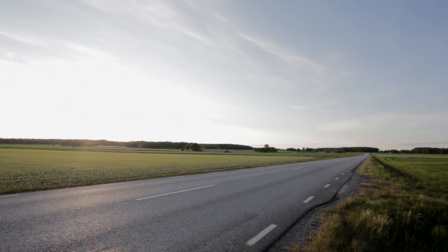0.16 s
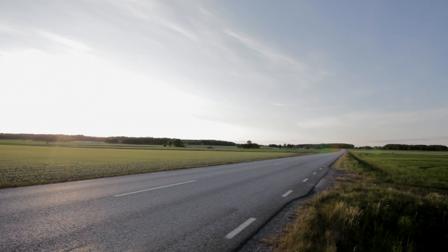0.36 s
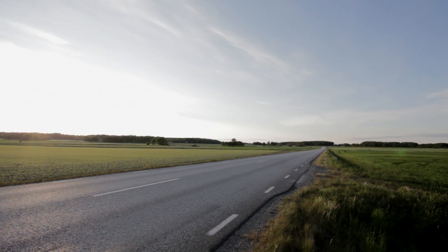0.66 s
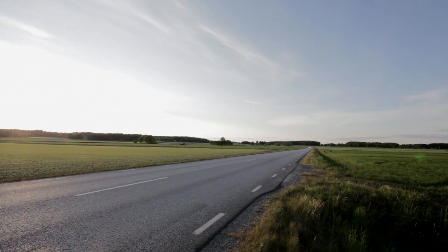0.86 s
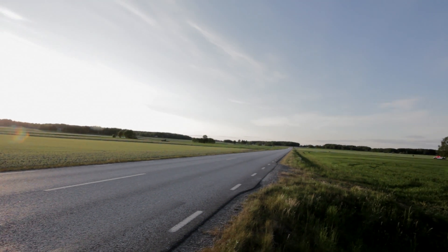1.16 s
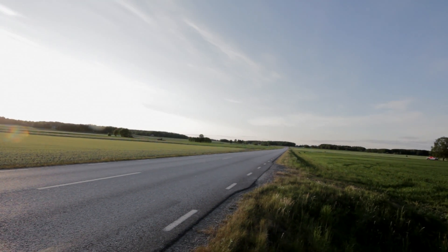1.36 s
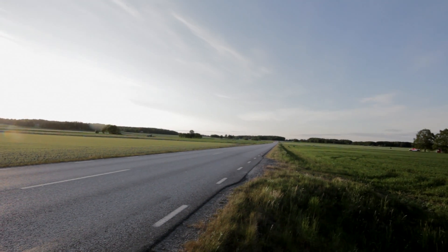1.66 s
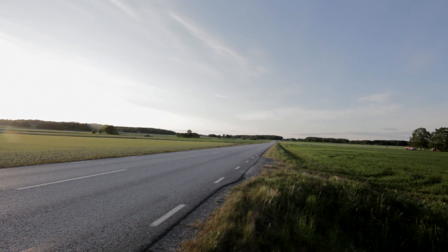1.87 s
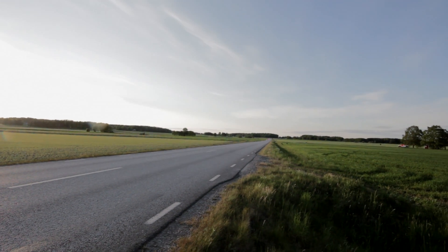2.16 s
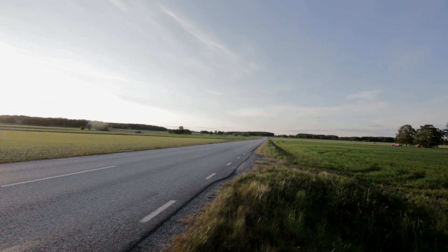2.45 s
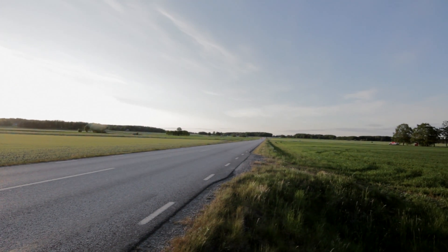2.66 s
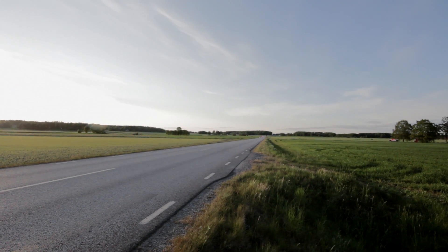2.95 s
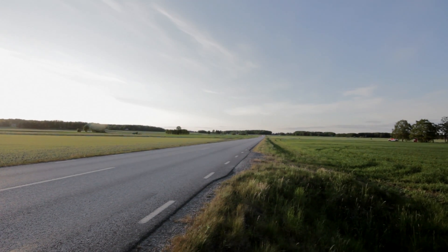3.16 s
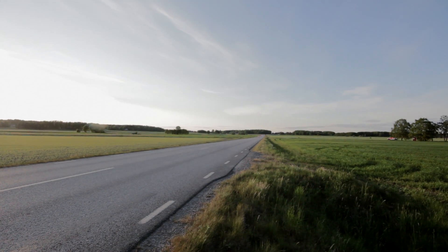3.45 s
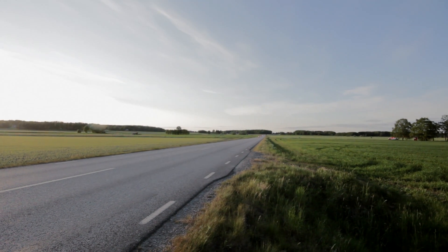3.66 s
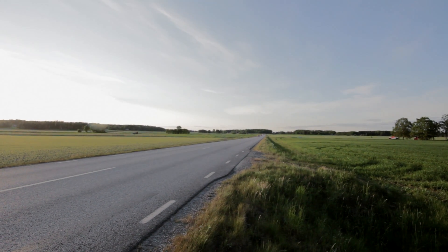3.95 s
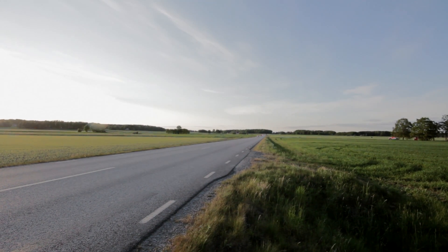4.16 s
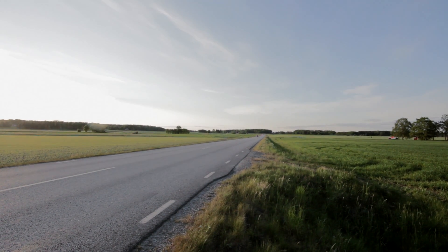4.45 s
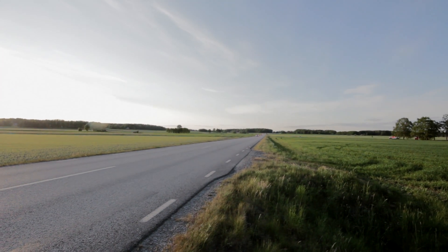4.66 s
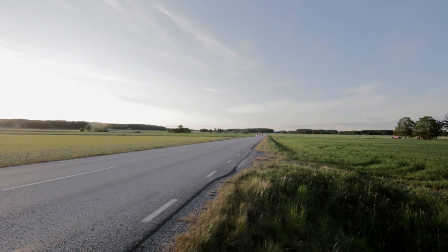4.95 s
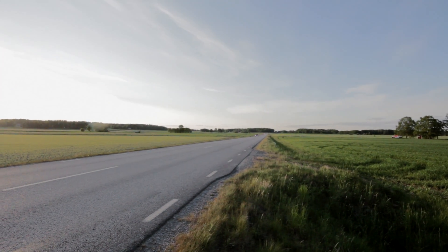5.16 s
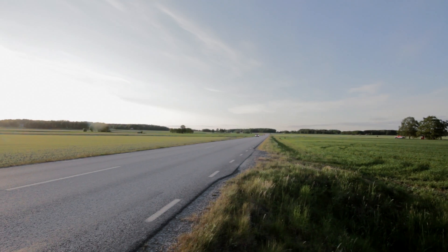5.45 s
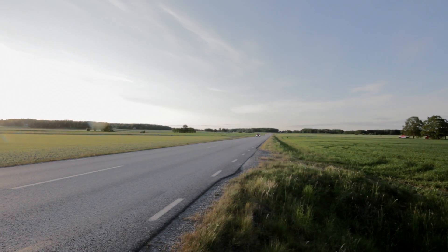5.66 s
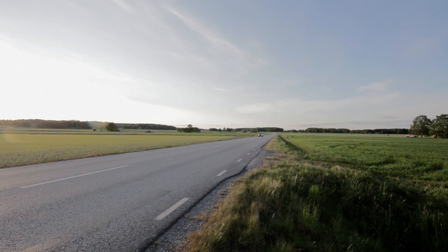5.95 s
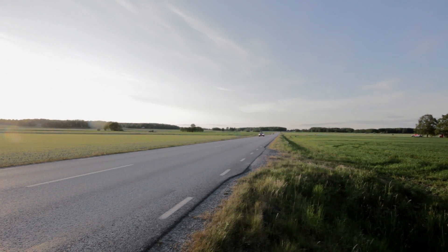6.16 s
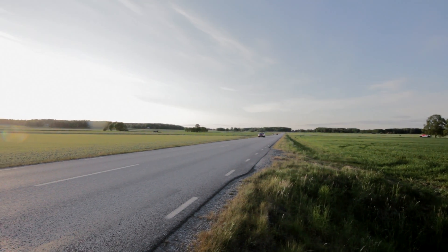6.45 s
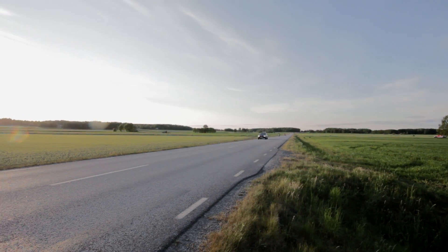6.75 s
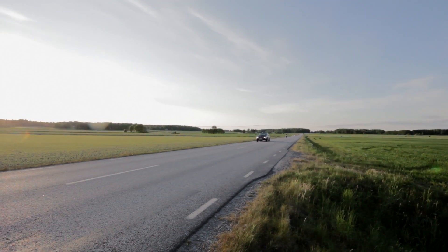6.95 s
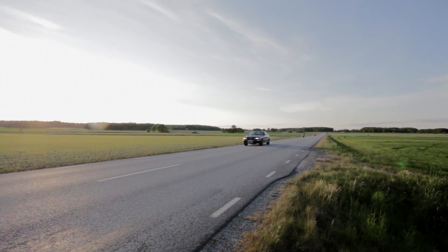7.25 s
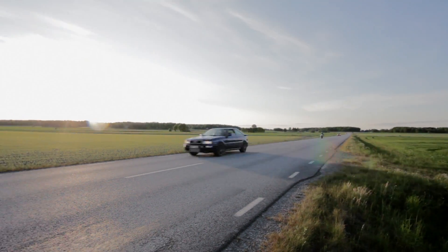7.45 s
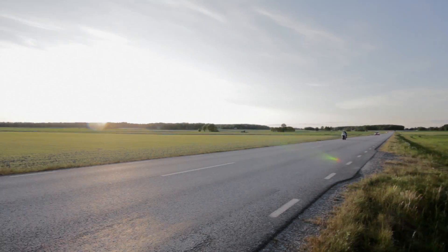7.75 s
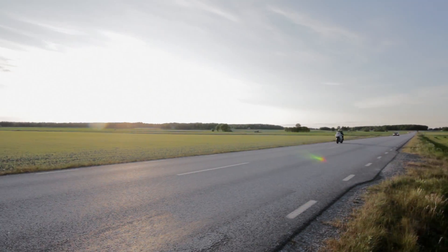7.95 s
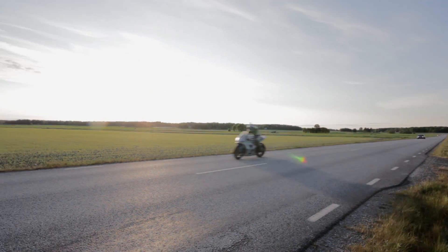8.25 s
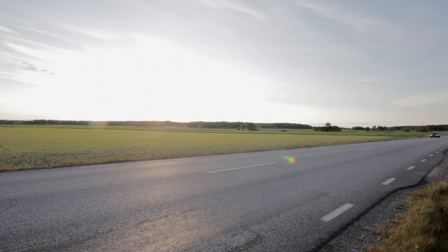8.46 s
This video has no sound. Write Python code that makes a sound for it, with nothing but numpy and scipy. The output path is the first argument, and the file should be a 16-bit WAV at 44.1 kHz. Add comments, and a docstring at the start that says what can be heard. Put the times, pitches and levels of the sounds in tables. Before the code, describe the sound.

Roadside pass-bys: hollow, phasey road noise builds, a five-cylinder car rips by dropping in pitch, then a high-revving motorcycle flashes past.

```python
"""A country road: a turbocharged five-cylinder car and then a motorcycle race past a roadside microphone.
Tyre roar is shaped noise; a delayed copy sweeps notches through it, and its hiss brightens as vehicles near.
Engine notes are sums of wavering tones that drop in pitch at the pass; the turbocharger is a gliding whistle.
Fainter engine tones rise, a far engine coasts, a slower vehicle drones away in steady tones, and low noise
is wind on the microphone."""
import sys
import numpy as np
from scipy import signal
from scipy.fft import rfft, irfft
from scipy.io import wavfile
from scipy.ndimage import uniform_filter1d

SR = 44100
rng = np.random.default_rng(int(sys.argv[2]) if len(sys.argv) > 2 else 0)


def bounce(signal):
    """Save signal as a 16-bit WAV file at the path given by the first command-line argument."""
    frames = np.transpose(np.atleast_2d(signal))
    limited = np.clip(frames, -1, 1)
    pcm = np.round(limited * 32767).astype(np.int16)
    wavfile.write(sys.argv[1], SR, pcm)


N = 379260
TIME = np.arange(N) / SR  # seconds
FRAME, HOP = 1024, 256  # samples in a noise frame, and from one frame to the next
FRAME_S, BIN_HZ = np.arange(N // HOP + 5) * HOP / SR, np.fft.rfftfreq(FRAME, 1 / SR)


def gain_of(db):
    """Decibels to amplitude."""
    return 10 ** (np.asarray(db) / 20)


def follow(rows, t):
    """Read every column of a timed table at the times t, in straight lines between its rows."""
    s, *columns = np.transpose(rows)
    return [np.interp(t, s, column) for column in columns]


def colour(points):
    """Amplitude of a spectrum at every frequency bin."""
    hz, db = np.transpose(points)
    return gain_of(np.interp(np.log(BIN_HZ + 1), np.log(hz), db))


def wander(rate_hz):
    """A random sway of rms 1, mostly slower than the given rate."""
    spectrum = rfft(rng.standard_normal(2 ** 13))
    bin_hz = np.arange(len(spectrum)) * SR / N
    sway = irfft(spectrum / (1 + (bin_hz / rate_hz) ** 4))
    return np.interp(TIME, np.linspace(0, N / SR, len(sway)), sway / sway.std())


def power(shape, db):
    """Power by frame and bin of a spectrum played at a changing level."""
    return shape ** 2 / np.sum(shape ** 2, -1, keepdims=True) * gain_of(db)[:, None] ** 2


def noise(field):
    """Noise with the given power by frame and bin."""
    z = rng.standard_normal(field.shape) + 1j * rng.standard_normal(field.shape)
    return signal.istft((z * np.sqrt(field)).T, nperseg=FRAME, noverlap=FRAME - HOP)[1][:N]


def swell(t, peak_s, db, rise_s, fall_s):
    """Level in dB of something that comes, peaks and goes."""
    u = (t - peak_s) / np.where(t < peak_s, rise_s, fall_s)
    return db - 20 * np.log10(1 + u ** 2)


def passed(at_s, length_s):
    """A smooth step from 0 before a moment to 1 after it."""
    return .5 + .5 * np.tanh((TIME - at_s) / length_s)


def during(start_s, end_s, fade_s=0.092):
    """1 between two times, with soft edges."""
    return np.clip(.5 + np.minimum(TIME - start_s, end_s - TIME) / fade_s, 0, 1)


def doppler(abreast_s, near_s, mach):
    """Pitch factor of a source driving by in a straight line: raised coming, lowered going."""
    ahead_s = abreast_s - TIME
    return 1 / (1 - mach * ahead_s / np.hypot(ahead_s, near_s))


# How strong the car's upper tread resonance and hiss are as it comes and goes.
# Each row: time in seconds, strength in dB.
TYRES = [(0, -12.5), (1, -11), (2.45, -9), (2.85, 0), (3.4, -2.5), (4.3, 0), (5.35, -1), (5.6, 1.5),
         (5.75, -0.4), (6.7, 0.5), (6.95, -1), (7.82, -5.5), (7.89, -12.5), (8.6, -25)]
# The car's low road roar. Each row: time in seconds, drone level in dB, body level in dB.
LOW_ROAR = [(0, -34.5, -38), (1, -34.5, -40), (2.7, -33, -34.5), (3.6, -33.5, -38), (4.65, -28, -31),
            (5.3, -34.5, -32), (5.75, -38.5, -34.5), (6.5, -36.5, -34), (6.9, -41, -36), (7.65, -36.5, -32),
            (8.1, -41, -37), (8.6, -37, -43)]
# The car's main tread resonance. Each row: time in seconds, level in dB.
TREAD = [(0, -40), (.7, -37.5), (.95, -34.5), (2.4, -32.5), (2.7, -45), (3.05, -28.5), (4.2, -31),
         (4.7, -25.5), (6.4, -28), (7.6, -32), (7.95, -36.5), (8.6, -42)]
UPPER_DB, UPPER_GROWTH = -25.5, 1.19  # upper resonance: dB at strength 0, dB added per dB of strength
# The motorcycle's rush, one swell for each part.
# Each one: peak in seconds, level in dB, rise in seconds, fall in seconds.
BIKE_DRONE, BIKE_BODY = (8.43, -30, .12, .11), (8.34, -32, .14, .2)
BIKE_TREAD, BIKE_UPPER = (8.31, -25.5, .08, .12), (8.44, -30, .15, .12)
BIKE_SPREAD = 2.2  # its tyre resonances are this many times wider than the car's


def road_roar(patchy_db=0.9, flutter_db=0.67, puff_depth=.55, puff_s=0.98):
    """Tyre and air noise: a delayed copy sweeps notches through it and turbulence mottles it."""
    tyres_db, = follow(TYRES, FRAME_S)
    upper_db = UPPER_DB + UPPER_GROWTH * tyres_db
    car = tyre_roar(*follow(LOW_ROAR, FRAME_S), *follow(TREAD, FRAME_S), upper_db, 1)
    bike_levels = [swell(FRAME_S, *part) for part in (BIKE_DRONE, BIKE_BODY, BIKE_TREAD, BIKE_UPPER)]
    bike = tyre_roar(*bike_levels, BIKE_SPREAD)
    patches = rng.standard_normal(car.shape)
    patches = uniform_filter1d(patches, size=14, axis=0)  # smooth over time
    patches = uniform_filter1d(patches, size=8, axis=1)  # smooth over pitch
    mottling = phasing() * gain_of(patchy_db * patches / patches.std()) ** 2
    # at first the hiss puffs in time with the slow vehicle's exhaust
    puff_angle = 2 * np.pi * HUM_TONES[0][0] * TIME + wander(16)
    puffing = 1 + puff_depth * np.exp(-TIME / puff_s) * np.cos(puff_angle)
    roar = noise((car + bike) * mottling)
    hiss = noise(tyre_hiss(tyres_db) * mottling) * puffing
    return (roar + hiss) * gain_of(flutter_db * wander(55))


def crest(centre_hz, width_hz):
    """A resonance with steep skirts."""
    off = ((BIN_HZ - centre_hz) / width_hz) ** 2
    return 1 / (1 + 0.68 * off + 0.12 * off ** 2)


# Spectra of the drone and the body of the roar. Each row: frequency in Hz, relative level in dB per Hz.
DRONE = [(30, -27.5), (95, -20.5), (115, -21.5), (140, -4.5), (220, 0.5), (320, -3), (400, -6),
         (520, -12.5), (800, -26.5), (1500, -64)]
BODY = [(100, -28.5), (300, -18.5), (430, 0.5), (550, 1.5), (750, -2.5), (900, -13.5), (1300, -17),
        (2500, -65)]
TREAD_HZ, TREAD_WIDTH_HZ = 951, 100  # main tread resonance, with the car's width
UPPER_HZ, UPPER_WIDTH_HZ = 1309, 176  # upper tread resonance, with the car's width


def tyre_roar(drone_db, body_db, tread_db, upper_db, spread):
    """Power of one vehicle's roar: drone, body and two tread resonances."""
    low = power(colour(DRONE), drone_db) + power(colour(BODY), body_db)
    tread = power(crest(TREAD_HZ, spread * TREAD_WIDTH_HZ), tread_db)
    upper = power(crest(UPPER_HZ, spread * UPPER_WIDTH_HZ), upper_db)
    return low + tread + upper


# Spectrum of the hiss before the air dulls it. Each row: frequency in Hz, relative level in dB per Hz.
HISS = [(600, -29.5), (1300, -13.5), (1720, 3.5), (2100, -0.5), (2500, -3), (3150, -4), (4400, -9.5),
        (7000, -15), (10000, -18), (13000, -17.5), (16000, -21)]
HISS_DB = -37  # the car's hiss at strength 0, far away
HISS_NEAR_DB, HISS_NEAR_S = 9.5, 1.0  # extra dB when the car is close, and how quickly it builds
# The motorcycle's hiss: peak in seconds, level in dB, rise in seconds, fall in seconds.
BIKE_HISS = (8.46, -28.5, .16, .18)


def tyre_hiss(tyres_db, steepening=0.043):
    """Power of the hiss of both vehicles, dulled by the air on the way."""
    closeness = np.exp(-np.maximum(CAR_BRIGHT_S - FRAME_S, 0) / HISS_NEAR_S)
    car_db = HISS_DB + tyres_db + HISS_NEAR_DB * closeness
    level = gain_of(car_db) ** 2 + gain_of(swell(FRAME_S, *BIKE_HISS)) ** 2
    khz = np.maximum(BIN_HZ - 1900, 0) / 1e3  # only the part above 1900 Hz is dulled
    loss_db = air_loss()[:, None] * khz * (1 + steepening * khz)
    hiss = (colour(HISS) * gain_of(-loss_db)) ** 2
    # the level is that of the middle band
    middle = (BIN_HZ > 1800) & (BIN_HZ < 3200)
    return hiss / np.sum(hiss[:, middle], 1, keepdims=True) * level[:, None]


# Moving air lets the treble through in waves.
# Each row: centre in seconds, extra loss in dB per kHz, length in seconds.
AIR_WAVES = [(4.05, 2, .35), (4.9, -0.55, .3), (5.7, 0.9, .15), (6.25, -0.4, 0.12), (7.15, 0.17, .35)]
CAR_BRIGHT_S, BIKE_BRIGHT_S = 7.62, 8.45  # when each vehicle sounds brightest
LOSS_NEAR, LOSS_FAR = -0.21, 6.54  # dB per kHz at the brightest moment, and the most before the waves
LOSS_PER_S_COMING, LOSS_PER_S_GOING, LOSS_PER_S_BIKE = 1.376, 2.85, 5.5  # dB per kHz one second away
LOSS_CURVE = 1.02  # power of the time away


def air_loss():
    """Treble lost in the air in dB per kHz: it grows with time from the nearer vehicle's brightest moment."""
    since = FRAME_S - CAR_BRIGHT_S
    car = np.where(since < 0, LOSS_PER_S_COMING, LOSS_PER_S_GOING) * abs(since) ** LOSS_CURVE
    bike = LOSS_PER_S_BIKE * abs(FRAME_S - BIKE_BRIGHT_S) ** LOSS_CURVE
    waves = sum(loss * np.exp(-((FRAME_S - s) / length) ** 2) for s, loss, length in AIR_WAVES)
    return np.minimum(LOSS_NEAR + np.minimum(car, bike), LOSS_FAR) + waves


# An upside-down delayed copy of the roar, whose changing lag sweeps notches through it.
# Each row: time in seconds, lag in milliseconds, depth of the notches from 0 to 1.
DELAYED_COPY = [(0, 2.4, 0.1), (1, 2.34, 0.56), (1.5, 2.04, .25), (2.3, 2.08, 0.45), (2.6, 1.99, 0.74),
                (3, 1.78, 0.56), (3.55, 1.46, 0.6), (4.3, 1.016, 0.89), (4.65, 0.72, 0.8), (5.2, 0.53, .65),
                (5.6, 0.25, 0.4), (6.4, 0.48, 0.12), (7, 0.54, 0.16)]
FILL_IN_HZ = 3000  # around here and above the notches fill in


def phasing():
    """Power gain of a sound plus its delayed copy: the notches move up in pitch when the lag shrinks."""
    lag_ms, depth = follow(DELAYED_COPY, FRAME_S)
    depth = np.clip(depth, 0, .95)[:, None] / (1 + (BIN_HZ / FILL_IN_HZ) ** 2)
    return 1 - depth * np.cos(2 * np.pi * BIN_HZ * lag_ms[:, None] / 1e3)


def engine(hz, db, orders, behind, jitter, shimmer_db, rough):
    """Tones at multiples of an engine's rate; intake tones lead from the front, exhaust from behind."""
    turns = np.cumsum(hz * (1 + jitter * wander(23.9))) / SR
    out, total = np.zeros(N), 0
    for order, front_db, rear_db in orders:
        height = gain_of(front_db + (rear_db - front_db) * behind)
        angle = 2 * np.pi * (order * turns + rng.random())
        # moving air fades each tone on its own; uneven firing smears it
        steady = gain_of(shimmer_db * wander(5)) * np.cos(angle)
        smeared = rough * wander(38) * np.sin(angle)
        out += height * (steady + smeared)
        total = total + height ** 2 / 2
    return out / np.sqrt(total) * gain_of(db)


# The car's engine. Each row: time in seconds, crank turns a second before the pitch bend, level in dB.
CAR = [(5.7, 49.45, -45), (6.3, 50, -32), (6.7, 50.95, -30.5), (7, 52.55, -27), (7.4, 54.1, -26.5),
       (7.85, 54.2, -24.7), (8.12, 53.5, -27.5)]
# Its tones. Each row: multiple of the crank rate, relative dB from the front, relative dB from behind.
CAR_ORDERS = [(2, -17, -30), (4, -1.5, -25), (5, -2, 0), (6, -11, -24), (7, -11, -17), (8, -2.5, -25),
              (9, -11, -22), (10, -4, 0), (11, -11, -20), (14, -2, -22), (15, 5, -9), (15.5, -3, -18),
              (16, -10, -22), (20, -17, -13), (22, 0, -24), (25, -12, -15), (30, -6, -22), (36, -12, -26)]
# When abreast in seconds, seconds to cover its own closest distance, speed as a share of sound's.
CAR_PASS = (7.8, .13, .142)


def car_engine():
    """The five-cylinder gathers revs and drops in pitch as it goes by."""
    crank_hz, db = follow(CAR, TIME)
    hz = crank_hz * doppler(*CAR_PASS)
    sound = engine(hz, db, CAR_ORDERS, passed(7.68, .12), jitter=.0012, shimmer_db=1.4, rough=.2)
    return sound * during(CAR[0][0], CAR[-1][0])


def whistle(hz, db, smear, shimmer_db):
    """A fuzzy gliding tone of a fast-spinning part."""
    tone = np.sin(2 * np.pi * np.cumsum(hz * (1 + smear * wander(207))) / SR)
    return np.sqrt(2) * tone * gain_of(db + shimmer_db * wander(31))


# The turbocharger's whistle. Each row: time in seconds, level in dB.
TURBO_LEVEL = [(6.25, -56), (6.6, -59), (6.7, -46.5), (6.8, -55.5), (7.35, -56), (7.62, -44.5), (7.95, -61),
               (8.14, -62)]
# A thin whine of the approaching car. Each row: time in seconds, frequency in Hz, level in dB.
WHINE = [(6.1, 3140, -58), (6.3, 3220, -48.5), (6.6, 3220, -42), (6.85, 3250, -51)]
TURBO_HZ, TURBO_IDLE = 8060, .34  # full speed before the pitch bend, and the share it starts from
SPOOL_AT_S, SPOOL_S = 6.465, .28  # middle and length of the spooling up
TURBO_PASS = (7.72, .09, .142)  # abreast and closeness in seconds, share of the speed of sound


def car_whistles():
    """The turbocharger spools up and sweeps by; a thin whine is heard during the approach."""
    spool = TURBO_IDLE + (1 - TURBO_IDLE) * passed(SPOOL_AT_S, SPOOL_S)
    turbo_hz = TURBO_HZ * spool * doppler(*TURBO_PASS)
    turbo = whistle(turbo_hz, *follow(TURBO_LEVEL, TIME), smear=0.00656, shimmer_db=3.0)
    whine = whistle(*follow(WHINE, TIME), smear=0.0025, shimmer_db=1.0)
    turbo *= during(TURBO_LEVEL[0][0], TURBO_LEVEL[-1][0])
    return turbo + whine * during(WHINE[0][0], WHINE[-1][0])


# The motorcycle's tones. Each row: multiple of the firing rate, relative dB from the front, and from behind.
BIKE_ORDERS = [(.5, -18, -9), (1, 0, 0), (1.5, -18, -9), (2, -13, 0), (3, -16, -5), (4, -22, -8),
               (5, -26, -6), (7, -30, -11)]
BIKE_FIRING_HZ, BIKE_HEARD_S = 326, 8.07  # firing rate before the pitch bend, and when it fades in
BIKE_PASS = (8.465, .11, .175)  # abreast and closeness in seconds, share of the speed of sound
# Swell of its engine note: peak in seconds, level in dB, rise in seconds, fall in seconds.
BIKE_ENGINE = (8.33, -30, .34, .42)


def motorcycle():
    """Steady revs, bent down in pitch by the pass, with a rasp close by."""
    hz, db = BIKE_FIRING_HZ * doppler(*BIKE_PASS), swell(TIME, *BIKE_ENGINE)
    sound = engine(hz, db, BIKE_ORDERS, passed(8.42, .04), jitter=.002, shimmer_db=1.5, rough=.2)
    return (sound + rasp(hz)) * during(BIKE_HEARD_S, np.inf)


# Spectrum of the motorcycle's intake and chain rasp. Each row: frequency in Hz, relative level in dB per Hz.
RASP = [(800, -15), (2200, 0), (3200, -2), (4300, 0.5), (6500, -4.5), (9000, -10), (16000, -21)]
BIKE_RASP = (8.46, -29.5, .14, .11)  # its swell: peak in seconds, dB, rise and fall in seconds


def rasp(firing_hz, depth=0.6):
    """Hiss that puffs with every other firing of the motorcycle."""
    hiss = noise(power(colour(RASP), swell(FRAME_S, *BIKE_RASP))) * passed(8.26, .06)
    return hiss * (1 + depth * np.cos(np.pi * np.cumsum(firing_hz) / SR))


# Engine tones, each rising slowly: two gears of a far engine, then a tone of the approaching car.
# Each row: start in seconds, end in seconds, first frequency in Hz, last frequency in Hz, level in dB.
RISING_TONES = [(.85, 2.42, 424, 477.8, -41), (2.6, 4.4, 428, 469.4, -36), (5.71, 6.55, 461, 471, -44)]
RISE_EASING = .7  # each tone climbs ever more slowly


def rising_tones():
    """A far engine climbs through two gears, then a tone of the approaching car climbs likewise."""
    orders, out = [(1, 0, 0), (2, -6, -6), (3, -10, -10)], np.zeros(N)
    for start, end, first_hz, last_hz, db in RISING_TONES:
        share = np.clip((TIME - start) / (end - start), 0, 1)
        climb = np.expm1(-RISE_EASING * share) / np.expm1(-RISE_EASING)
        hz = first_hz + (last_hz - first_hz) * climb
        sound = engine(hz, db, orders, 0, jitter=.002, shimmer_db=2.5, rough=.28)
        out += sound * during(start, end)
    return out


# A far engine coasting, slowly losing speed. Each row: time in seconds, firing rate in Hz, level in dB.
COASTING = [(.2, 561, -46), (2.45, 513, -41.5), (2.8, 507, -62), (3.25, 500.5, -28), (4.25, 488.5, -46),
            (4.65, 483.6, -35.5), (5.55, 472, -32.5), (6.8, 449.5, -38), (7.4, 440, -51.5)]


def coasting():
    """A far engine winds down, mostly heard at twice its firing rate."""
    orders = [(1, -17, -17), (2, 0, 0), (3, -15, -15)]
    sound = engine(*follow(COASTING, TIME), orders, 0, jitter=.002, shimmer_db=3.5, rough=.4)
    return sound * during(COASTING[0][0], COASTING[-1][0])


# A slower vehicle's tones, its boom first. Each row: frequency in Hz, level in dB before the fading.
HUM_TONES = [(64.4, -48), (129, -44.5), (144, -46), (274, -45), (306, -45.5), (692, -48.5), (722, -50.5)]
# How the tones above the boom fade. Each row: time in seconds, change in dB.
HUM_FADE = [(0, -1), (1, -0.5), (5, -11), (8.6, -19)]
# How the boom rises and fades. Each row: time in seconds, change in dB.
BOOM = [(0, 0), (1.5, -2.5), (4.6, 4), (5.3, -6), (8.6, -19)]


def hum(drift=0.00291, shimmer_db=2.3):
    """A steady exhaust boom with wavering tones above it, droning away."""
    out = np.zeros(N)
    for k, (hz, db) in enumerate(HUM_TONES):
        fade_db, = follow(HUM_FADE if k else BOOM, TIME)
        sway_db = (shimmer_db if k else .5) * wander(2.8)
        turns = np.cumsum(hz * (1 + drift * wander(2))) / SR
        out += gain_of(db + fade_db + sway_db) * np.sin(2 * np.pi * turns)
    return np.sqrt(2) * out


# Spectrum of wind on the microphone. Each row: frequency in Hz, relative level in dB per Hz.
GUST = [(15, -4), (35, 1.5), (60, 2.5), (100, -1), (160, -14), (400, -59.5)]
# The gusts. Each row: peak in seconds, level in dB, rise and fall length in seconds.
GUSTS = [(.25, -31, .05), (.5, -43, 0.12), (2.97, -33, .08), (8.45, -46.5, 0.13)]
# The background level, which sinks on the way. Each row: time in seconds, change in dB.
BACKGROUND = [(0, 2), (4.7, 0), (5.3, -14.5), (8.6, -15)]
# Spectrum of a faint even hiss. Each row: frequency in Hz, relative level in dB per Hz.
FLOOR = [(100, 0), (4000, 1), (9000, 0), (16000, 0)]
# Small clicks. Each row: time in seconds, starting level in dB.
TICKS = [(.107, -43), (.342, -46), (.98, -52)]
FLOOR_DB, BREEZE_DB = -67, -56  # even hiss and steady breeze, before the background's change
BREEZE_SINK = 0.5  # the breeze takes this share of the background's change


def microphone():
    """Low wind buffets, a faint even hiss and a few tiny, dull clicks."""
    sink_db, = follow(BACKGROUND, FRAME_S)
    wind = power(colour(GUST), BREEZE_DB + BREEZE_SINK * sink_db)
    wind += sum(power(colour(GUST), swell(FRAME_S, s, db, length, length)) for s, db, length in GUSTS)
    out = noise(wind + power(colour(FLOOR), FLOOR_DB + sink_db))
    t = np.arange(SR // 200) / SR
    for s, db in TICKS:
        burst = uniform_filter1d(rng.standard_normal(len(t)), size=4)  # dulled noise
        out[round(s * SR):][:len(t)] += gain_of(db) * burst / burst.std() * np.exp(-t / 0.00067)
    return out


def scene():
    """Everything reaches both channels alike, the left one a hair later except in the bass."""
    vehicles = road_roar() + car_engine() + car_whistles() + motorcycle()
    mono = vehicles + rising_tones() + coasting() + hum() + microphone()
    hz = np.fft.rfftfreq(N, 1 / SR)
    lag_s = 5.3e-6 * np.clip((hz - 200) / 400, 0, 1)
    left = irfft(rfft(mono) * np.exp(-2j * np.pi * hz * lag_s), N)
    return np.array([left, mono])


EDGE_HZ = 16450  # upper edge of the sound


def record(dry):
    """The recorder's band limit: a steep filter takes away what lies above the edge."""
    low_pass = signal.firwin(511, EDGE_HZ, window=("kaiser", 9), fs=SR)
    return signal.oaconvolve(dry, low_pass[None], "same")


dry = scene()
out = record(dry)
bounce(out)
```